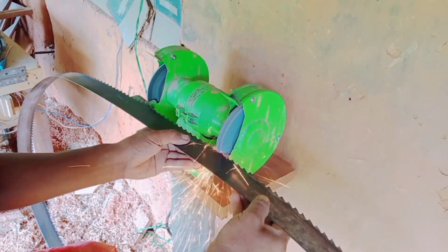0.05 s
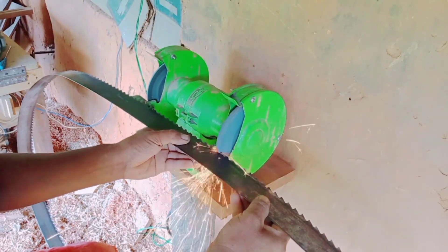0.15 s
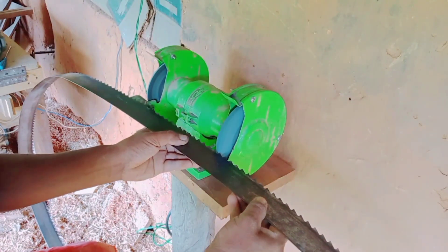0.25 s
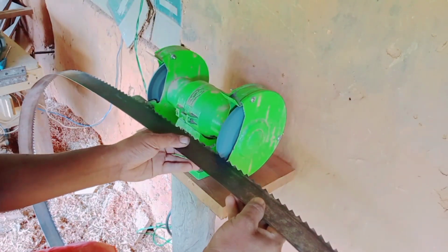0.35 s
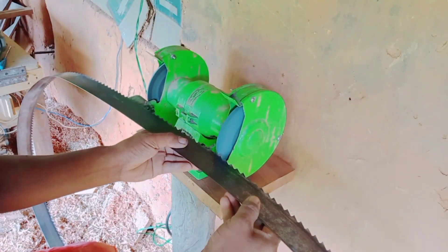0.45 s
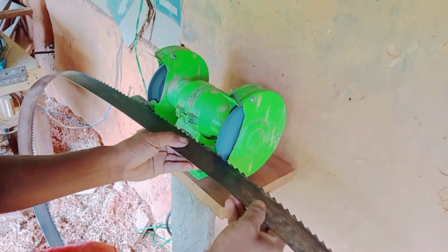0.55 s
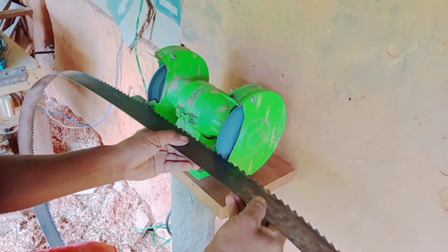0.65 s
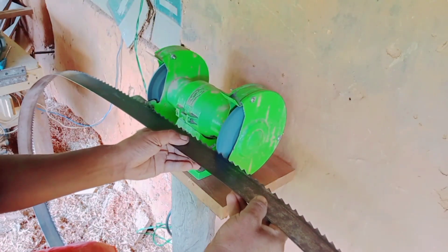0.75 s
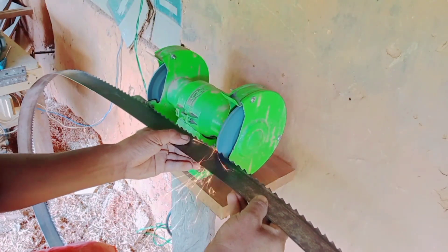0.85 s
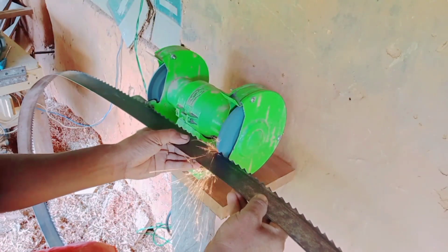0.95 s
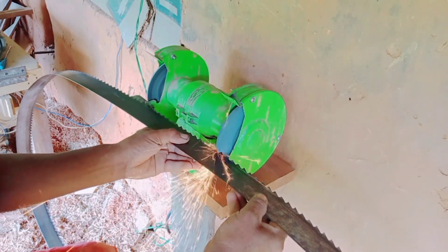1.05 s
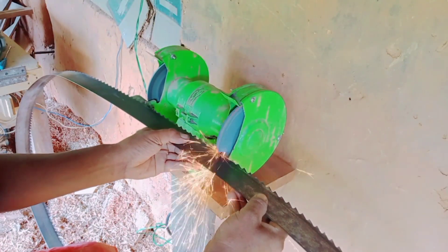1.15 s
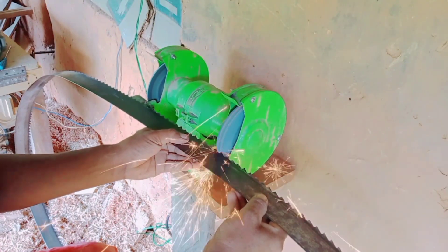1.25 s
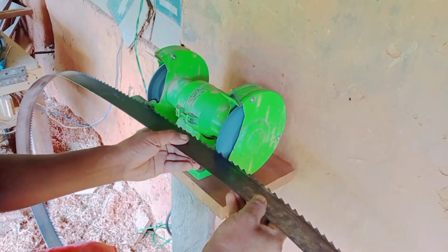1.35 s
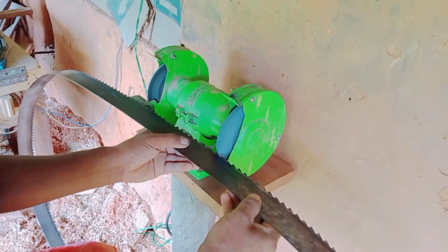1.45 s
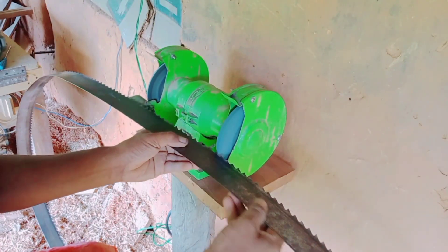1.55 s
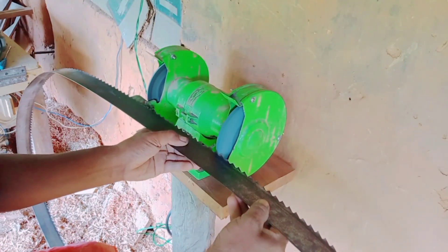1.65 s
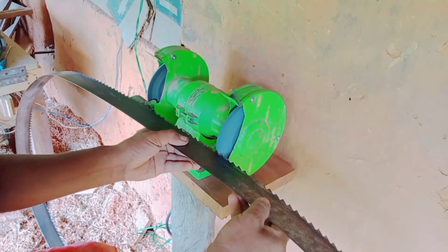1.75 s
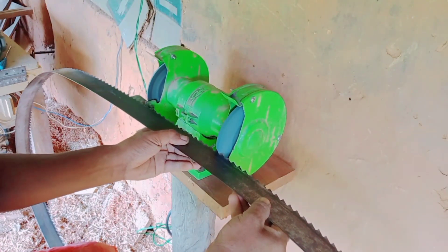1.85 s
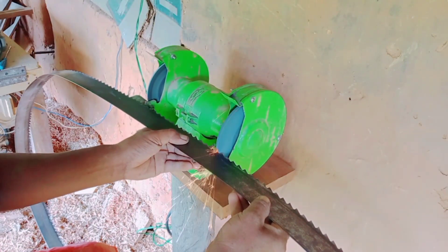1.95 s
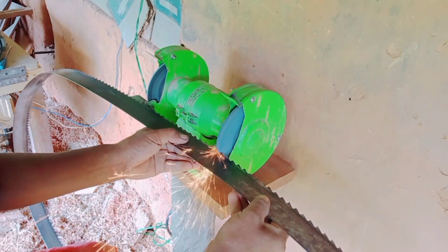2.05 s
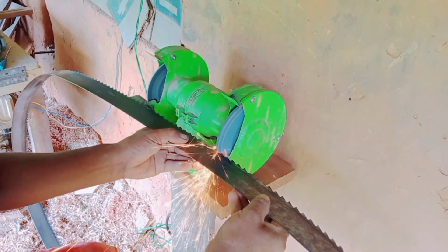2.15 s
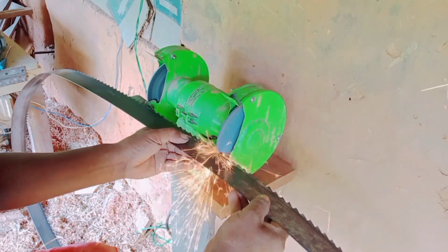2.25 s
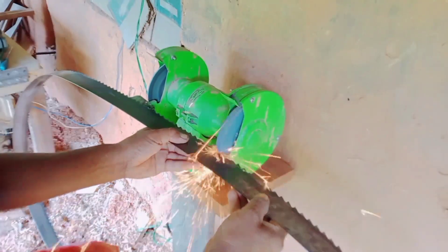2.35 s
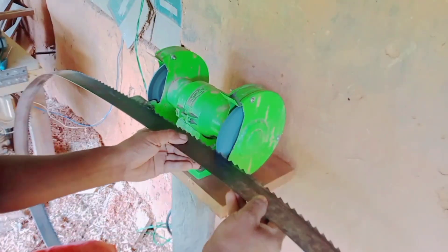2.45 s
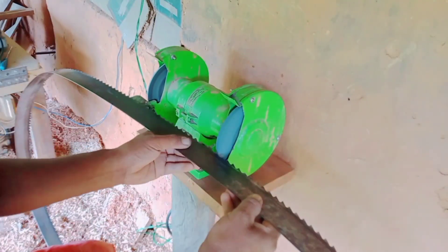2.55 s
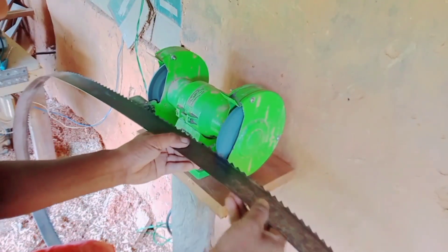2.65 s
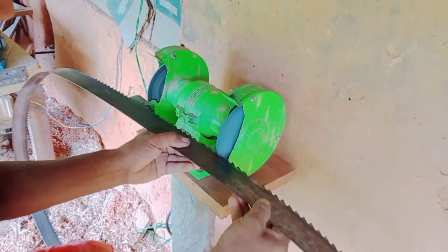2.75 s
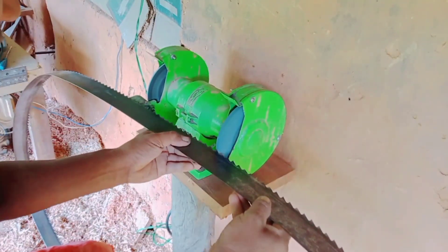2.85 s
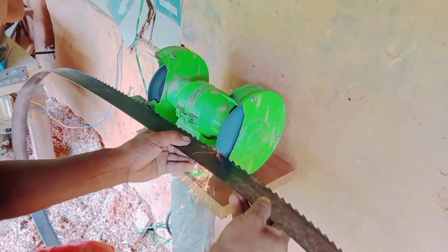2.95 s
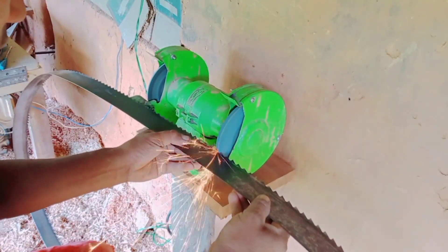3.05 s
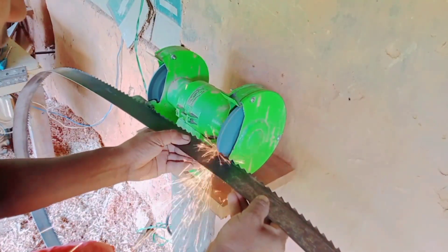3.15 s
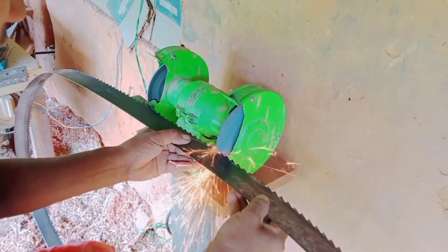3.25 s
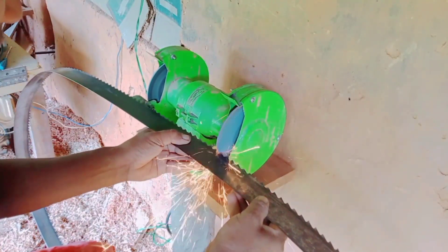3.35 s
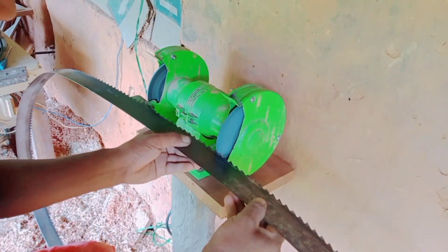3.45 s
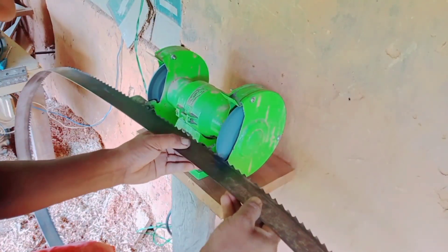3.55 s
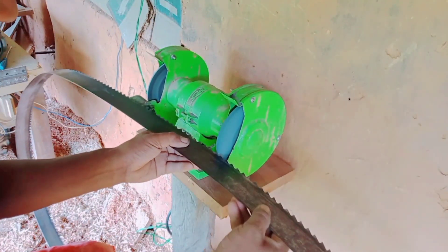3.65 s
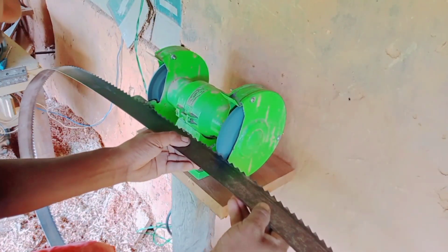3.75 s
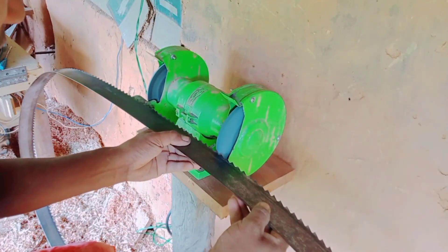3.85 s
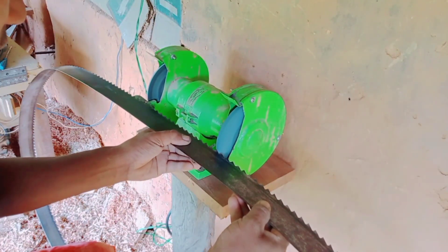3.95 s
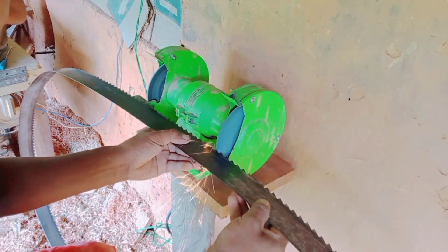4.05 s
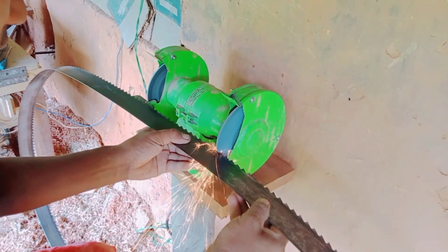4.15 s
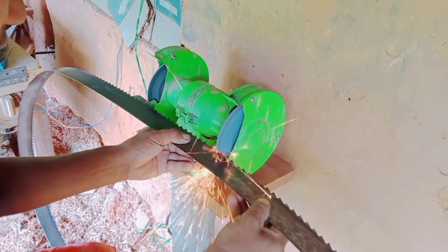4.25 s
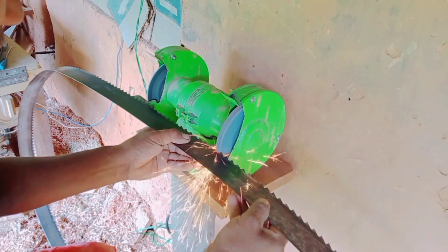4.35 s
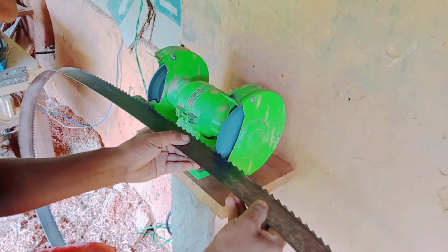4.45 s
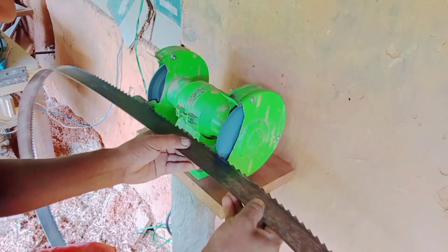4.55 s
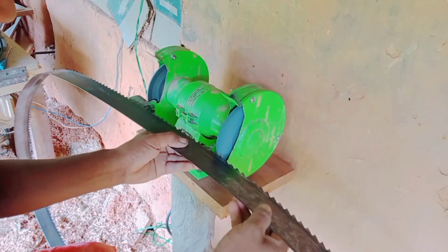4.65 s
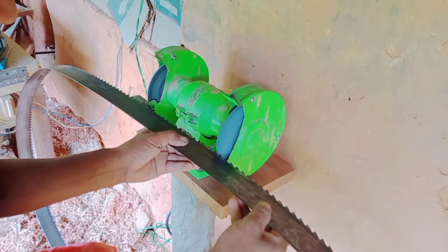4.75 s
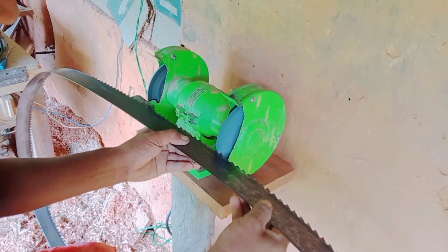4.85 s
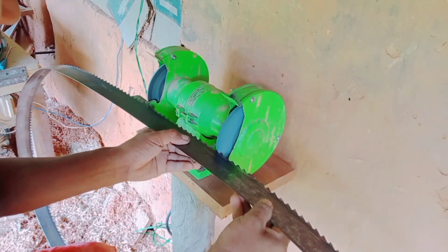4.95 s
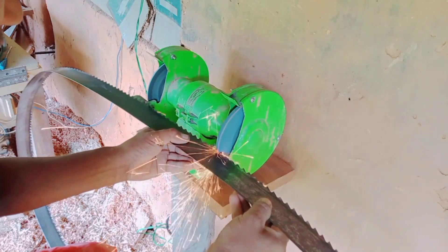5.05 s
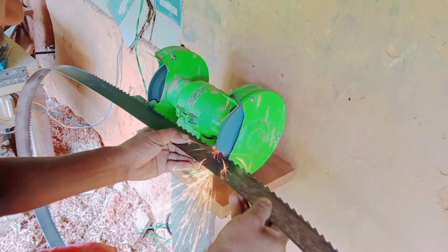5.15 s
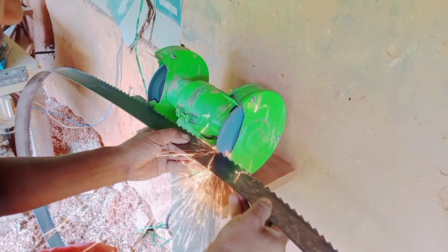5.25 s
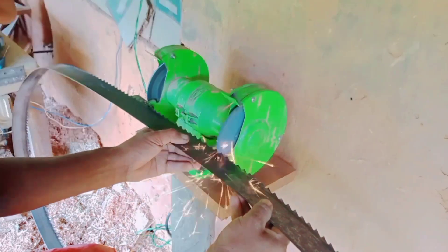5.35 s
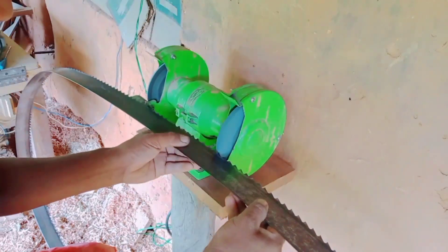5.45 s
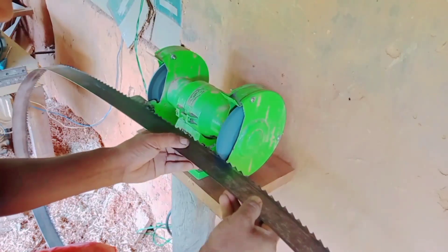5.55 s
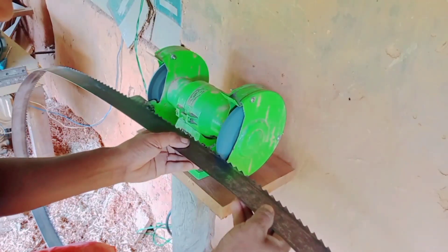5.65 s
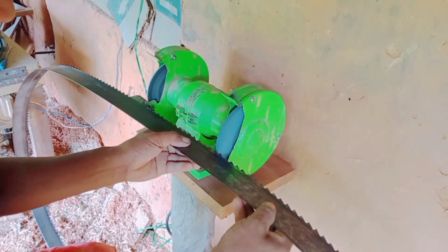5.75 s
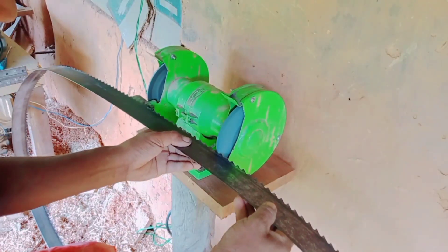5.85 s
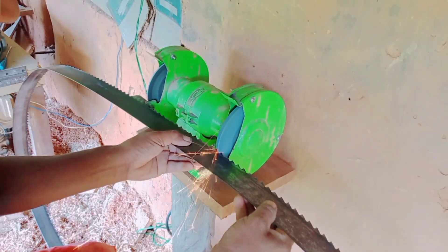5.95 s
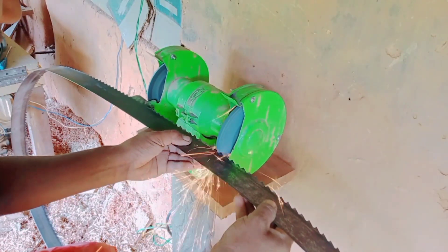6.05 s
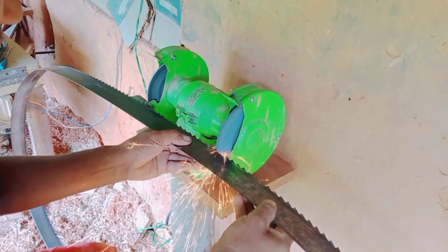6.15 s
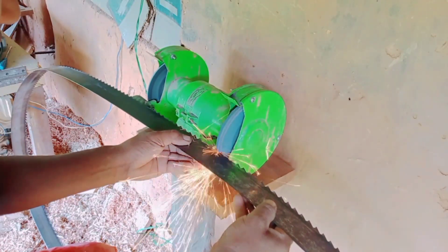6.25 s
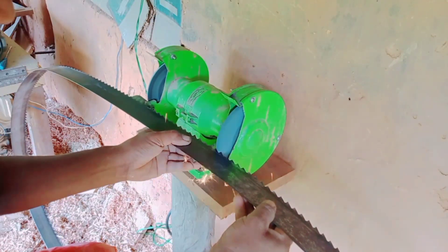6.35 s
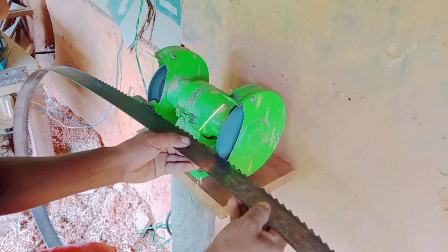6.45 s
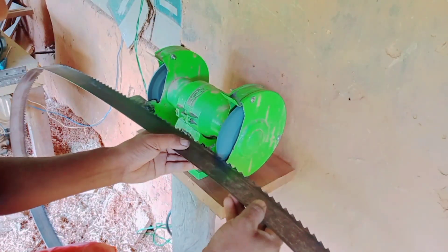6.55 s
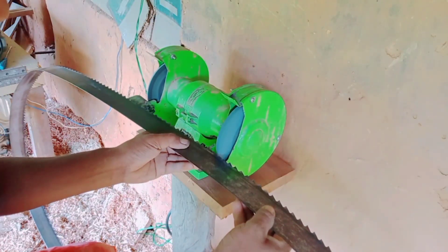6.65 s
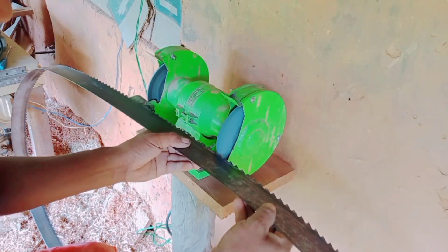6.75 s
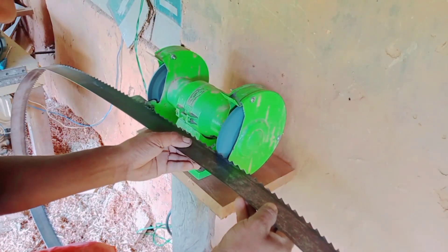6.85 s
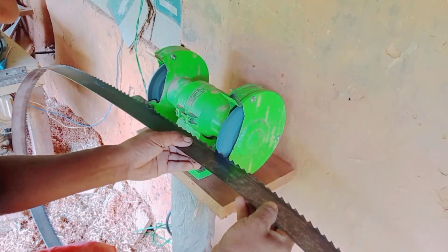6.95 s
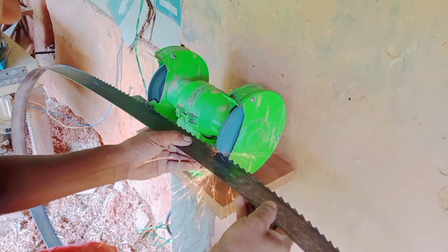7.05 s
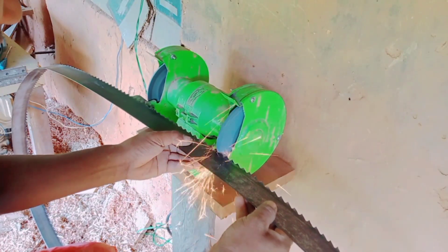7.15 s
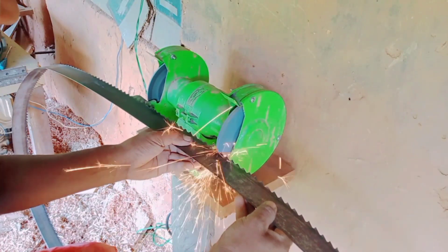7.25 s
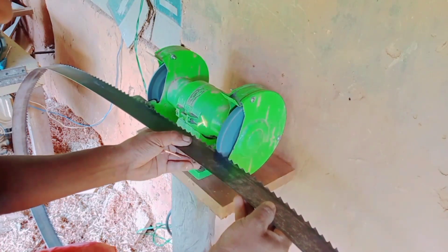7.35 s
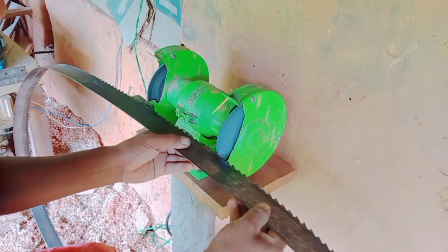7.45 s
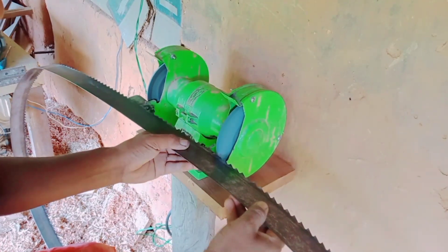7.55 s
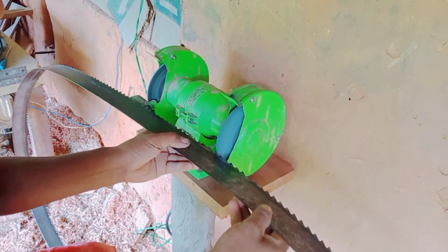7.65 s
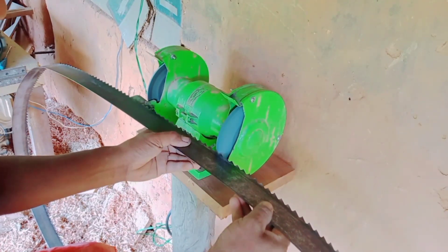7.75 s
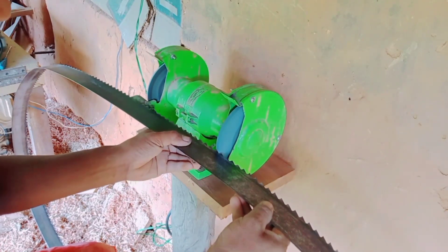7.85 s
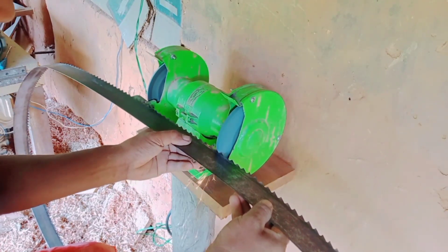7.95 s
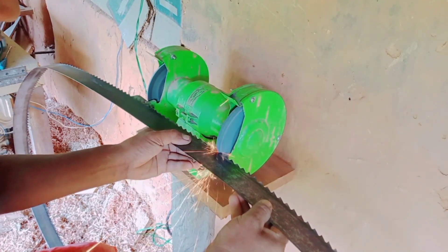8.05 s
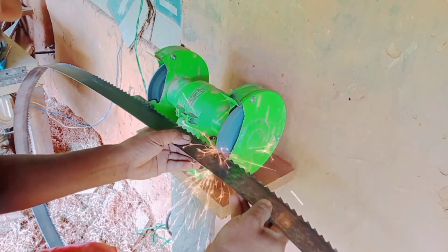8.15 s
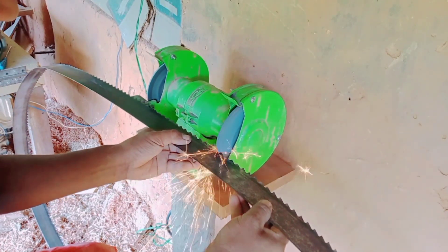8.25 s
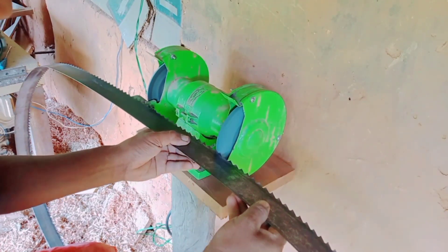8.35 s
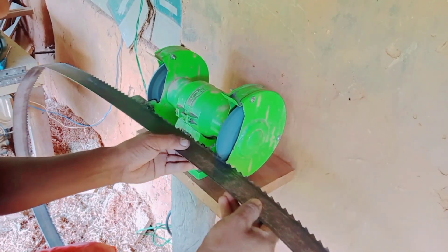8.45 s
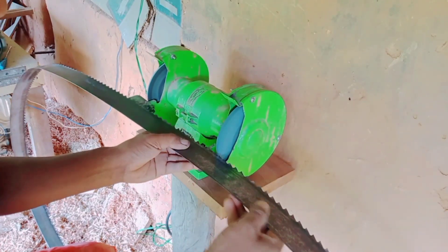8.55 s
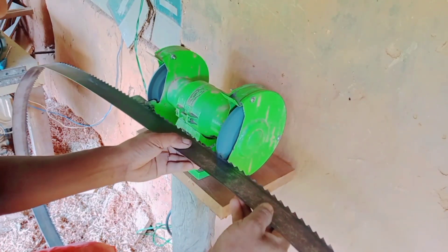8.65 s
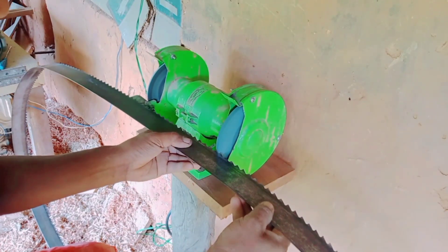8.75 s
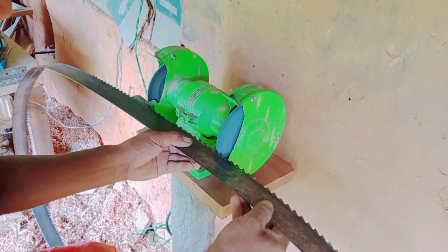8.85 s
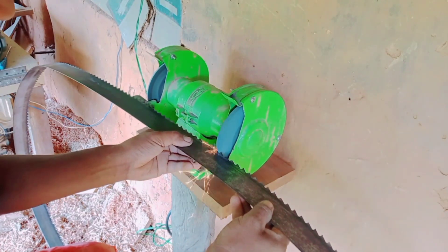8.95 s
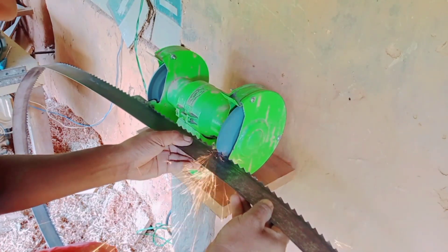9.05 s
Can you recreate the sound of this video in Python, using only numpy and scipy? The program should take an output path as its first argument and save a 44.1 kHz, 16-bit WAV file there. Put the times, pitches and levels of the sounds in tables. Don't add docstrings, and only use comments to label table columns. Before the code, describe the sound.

A small, close microphone in an open yard hears a saw blade ground on a bench grinder. A strong rasp is already under way at 0 s and stops at about 0.26. Further strokes begin near 0.9, 2.0, 3.0, 4.0, 5.0, 6.0, 7.0, 8.0 and 9.0 s, each lasting roughly 0.35 to 0.5 s. Most start with a light, fluttering buzz of knocks, about seventy-three per second, then thicken into rough, dense chatter as pressure grows and the wheel slows slightly. Bright grit hiss and a noisy metallic whistle, shifting from tooth to tooth, ride on top. Some strokes skip briefly or end with a sharp tick. The last, from 9.0 to 9.4, stays lighter and hissier. Blade, bench and yard ring for a fraction of a second after each; the gaps hold only a very faint, thin, patchy motor whirr.

```python
import sys
import numpy as np
from scipy import signal
from scipy.fft import rfft, irfft
from scipy.io import wavfile
from scipy.ndimage import uniform_filter1d

SR = 44100
rng = np.random.default_rng(int(sys.argv[2]) if len(sys.argv) > 2 else 0)


def level_to_linear(level):
    exponent = np.asarray(level, float) / 20
    return 10 ** exponent


def unload_audio(sound):
    columns = np.transpose(np.atleast_2d(sound))
    steps = np.round(np.clip(columns, -1, 1) * 32767)
    wavfile.write(sys.argv[1], SR, steps.astype(np.int16))


N = 401310
T = np.arange(N) / SR
FREE_HZ = 73.1

# [high spot passes t/s, lift-off t/s, wheel speed f/Hz, slowing Hz per s, whistle f/Hz]
STROKES = [(.006, .259, 72.5, 14, 4300), (.919, 1.348, 73.7, 12, 4500), (1.965, 2.456, 73.8, 11, 5100),
           (2.991, 3.44, 74.0, 15, 5000), (4.0425, 4.443, 73.8, 14, 4500), (5.034, 5.415, 73.5, 18, 4300),
           (6.003, 6.45, 73.3, 14, 4500), (7.036, 7.40, 73.2, 12, 4400), (8.013, 8.345, 73.7, 17, 4600),
           (8.9905, 9.4, 73.8, 1, 5150)]


def evened(x):
    return x / np.sqrt(np.mean(x ** 2) + 1e-20)


def read(points, hz):
    f, value = np.transpose(points)
    return np.interp(np.log(hz + 1), np.log(f + 1), value)


def causal(db):
    log = np.log(level_to_linear(np.maximum(np.r_[db, db[-2:0:-1]], -100)))
    return np.fft.ifft(np.exp(np.conj(signal.hilbert(log)))).real[:len(db)]


def coloured(x, points):
    gain = level_to_linear(read(points, np.fft.rfftfreq(len(x), 1 / SR)))
    return evened(irfft(rfft(x) * gain, len(x)))


def resonate(x, hz, width, order=1):
    turn = np.exp(2j * np.pi * np.cumsum(hz * np.ones(N)) / SR)
    r = np.exp(-np.pi * width / SR)
    smooth = signal.lfilter([(1 - r) ** order], np.poly([r] * order), x * turn.conj())
    return 2 * (turn * smooth).real


def wander(per_s):
    knots = rng.standard_normal(int(N / SR * 600))
    return evened(np.interp(T * per_s, np.arange(len(knots)), knots))


def tooth_number():
    return np.searchsorted(np.array(STROKES)[1:, 0] - .1, T)


def wheel():
    catch_up_s = 0.15
    turns = np.zeros(N)
    for s, off, hz, sag, _ in STROKES:
        after = T >= s - .004 if s > .5 else T >= 0
        t = T[after]
        loaded = hz - sag * (np.minimum(t, off) - s)
        speed = FREE_HZ - (FREE_HZ - loaded) * np.exp(-np.maximum(t - off, 0) / catch_up_s)
        turns[after] = np.cumsum(speed) / SR + (t[0] - s) * hz
    return turns


def motor(turns):
    # [multiple of the wheel speed, level/dB]
    shaft = [(2, -99), (3, -111), (4, -104), (5, -106), (6, -98.5), (7, -107), (8, -98), (9, -100),
             (10, -88.5), (11, -81), (12, -90), (13, -80), (16, -108), (18, -108), (20, -105)]
    # [f/Hz, level/dB per Hz]
    whirr = [(625, -31), (790, -5), (970, -5), (1080, -37), (1750, -38), (1980, -15), (2470, -5),
             (3400, -16), (3700, -20), (4000, -24), (4500, -12.5), (5630, -11.5), (7210, -27.5),
             (9600, -25.5), (16000, -50)]
    # [f/Hz, width/Hz, level/dB]
    housing = [(785, 63, -38.5), (1660, 62, -11), (2070, 17, -18), (2250, 220, -3.5), (2960, 24, 5),
               (3370, 110, 3), (4450, 44, 1), (4980, 36, 4), (5570, 50, -7.5)]
    whirr_db = -68.5

    orders = 0
    for k, db in shaft:
        tone = np.cos(2 * np.pi * (k * turns + rng.random()))
        orders = orders + np.sqrt(2) * level_to_linear(db + 2.4 * wander(16)) * tone

    air = rng.standard_normal(N) * (1 + .3 * np.cos(2 * np.pi * turns))
    f = np.fft.rfftfreq(N, 1 / SR)
    response = sum(level_to_linear(db) / (1 + (2 * (f - hz) / w) ** 2) for hz, w, db in housing)
    hum = evened(irfft(rfft(air) * response, N))
    sound = orders + level_to_linear(whirr_db - 2.0) * coloured(air, whirr) + level_to_linear(whirr_db - 8) * hum

    hz, _, z = signal.stft(sound, SR, nperseg=1024)
    patches = uniform_filter1d(rng.standard_normal(z.shape), size=12, axis=0)
    patches = evened(uniform_filter1d(patches, size=14, axis=1))
    hz = hz[:, None]
    weak_db = np.clip(-read(whirr, hz) - 8, 0, 14) * (hz > 1000) * (hz < 6000) + 5 * (hz > 200)
    holes = level_to_linear(patches + weak_db * np.minimum(patches + .4, 0))
    return signal.istft(z * holes, SR, nperseg=1024)[1][:N]


def yard(x):
    # [f/Hz, level/dB per Hz]
    ring = [(120, -73.5), (200, -42.5), (417, -21), (532, -8.5), (716, -11), (963, -1), (1410, -41),
            (2150, -5), (3160, -11.5), (3570, -5), (4400, -8.5), (4800, -11), (7700, -17), (10000, -12.5),
            (13000, -42)]
    # [f/Hz, time to fall 60 dB t/s]
    ring_t60 = [(300, 0.11), (550, 0.2), (1000, 0.16), (2100, 0.16), (5500, 0.12), (10000, 0.15)]
    place, out = tooth_number() % 3, 0
    for k in range(3):
        hz, t, z = signal.stft(rng.standard_normal(SR // 3), SR, nperseg=512)
        modes_db = 3.8 * np.minimum(rng.exponential(1, (len(hz), 1)), 3)
        decay_db = -60 * t / read(ring_t60, hz)[:, None]
        z = z * level_to_linear(modes_db + read(ring, hz)[:, None] + decay_db)
        tail = signal.istft(z, SR, nperseg=512)[1]
        tail = tail * np.clip(np.arange(len(tail)) / SR / 0.014, 0, 1)
        out = out + signal.oaconvolve(x * (place == k), tail / np.linalg.norm(tail))[:N]
    return out


def hand():
    # [depth at first touch 0-1, bite t/s, depth there 0-1, firm t/s, eases off t/s]
    presses = [(0, .02, 0.7, 0.065, 0.26), (.25, 1.0, .3, 1.24, 1.335), (0.05, 2.05, .13, 2.25, 2.447),
               (0.1, 3.17, .25, 3.27, 3.41), (.2, 4.19, .2, 4.215, 4.428), (0.2, 5.1, 0.6, 5.13, 5.408),
               (0.12, 6.07, 0.3, 6.095, 6.395), (0.15, 7.105, .2, 7.122, 7.365),
               (.15, 8.06, 0.35, 8.075, 8.338), (0.3, 9.0, 0.2, 9.012, 9.19)]
    # [effort/dB, knocks, grit and whistle under the light touch/dB each, firm depth 0-1]
    teeth = [(3, 4, 3.5, 4, .7), (-0.5, 4, 0, -5, .75), (-0.5, -1.5, -4.5, -5.5, .9),
             (-0.5, 4.5, -1.5, -3.5, .85), (0, 4, -4, -3.5, .75), (1.5, 0, -0.5, -5.5, 0.7),
             (0, 7, 3, 0.5, .78), (-0.5, 1.5, 1, -1, .8), (0.5, 4, 0, -1.5, .6), (-4.5, 2.5, 7, -1, .02)]
    # [t/s, length/s, loss/dB]
    skips = [(.148, .012, 0), (4.18, .02, -8), (6.19, 0.013, -4.5), (6.155, .07, -2), (6.425, 0.0608, -16),
             (8.092, 0.016, -16.5), (8.141, 0.026, -2.5), (8.191, .03, -4)]
    # [level at full depth/dB, change per tenfold depth/dB, change on landing/dB,
    # change while letting go/dB, share of a skip's loss]
    layers = [
        (-26.5, 8.5, -25, -4.5, 0.9),
        (-50.5, -1, -6.5, 0, .25),
        (-35, -3.5, -8.5, 3.5, .3),
    ]
    lead_s = .004
    sink, last = 1.3, .05
    land_s, sudden = 0.024, .2
    brush_s, brush_db, trail_s, trail_db, grazes = 0.0073, -17, 0.028, -19.5, .23

    depth, gains = np.zeros(N), np.zeros((len(layers), N))
    skip_db = sum(db * np.clip(2 - 4 * abs(T - s) / length, 0, 1) for s, length, db in skips)
    for stroke, pressed, tooth in zip(STROKES, presses, teeth):
        spot, off, *_ = stroke
        first, bite, held, firm, ease = pressed
        effort_db, *own_db, deep = tooth
        touch, gentle = spot - lead_s, np.clip(1 - first / sudden, 0, 1)
        on = (T >= touch - brush_s * (first < grazes)) & (T < off + trail_s)
        t = T[on]
        depths = np.clip([first, held, deep, deep * sink], .01, 2)
        press = np.interp(t, [spot, bite, firm, ease], depths)
        landing = np.clip(1 - (t - touch) / land_s, 0, 1) * gentle
        light = np.interp(t, [bite, firm], [1, 0])
        going = np.clip((t - ease) / (off - ease), 0, 1)
        apart_db = brush_db * (t < touch) + trail_db * np.maximum(t - off, 0) / trail_s
        depth[on] = (press + (last - press) * going) * level_to_linear(skip_db[on])
        for k, (full_db, decade_db, land_db, go_db, skip) in enumerate(layers):
            hold_db = effort_db + full_db + own_db[k] * light + decade_db * np.log10(press)
            change_db = land_db * landing + go_db * going + skip * skip_db[on]
            gains[k, on] = level_to_linear(hold_db + change_db + apart_db)
        gains[0, on] *= (t >= touch) & (t < off)
    return depth, gains


def knock(snap, push, snap_width, push_width, lag):
    t = np.arange(1024) / SR
    snap_s, push_s = 4.5e-5 * level_to_linear(10.7 * snap_width), 0.0002 * level_to_linear(13.9 * push_width)
    late = np.maximum(t - 2e-4 - 0.00063 * lag, 0) / push_s
    return push * late * np.exp(1 - late) - snap * t / snap_s * np.exp(1 - t / snap_s)


def knocking(turns, meets, gain, count=18):
    # [t/s, snap level/dB, push level/dB, snap width 0-1, push width 0-1]
    bounces = [(.911, -1, -5, 0.24, 0.27), (1.349, -3, -21, 0.13, .5), (1.364, -5, -22.5, 0.44, 0.8),
               (5.036, 3, -19, 0.12, 0), (5.040, -6.5, -26, 0.6, 0), (6.431, -16, -21, 0.1, 0.6),
               (6.447, 2.5, -17, 0.25, 0), (7.39, -16, -31, 0.6, 0), (7.4, -10.5, -19.5, 0.23, 0.8),
               (8.077, -1, -23, 0.02, .1), (8.102, -2, -6.5, 0, 0.3), (9.004, -26, -4.5, 0.4, 0.9),
               (9.045, -24, -11, 1, 0.46), (9.085, -15, -14, .4, .8), (9.099, -18, -18, 1, 0.9)]
    rebounds = [(8.982, -6, -15, 1, .1), (8.990, -10, -24, 0.31, 0.99), (8.996, 0, -16, 0.9, 0.54)]
    # [f/Hz, level/dB per Hz]
    knock_colour = [(15, -56), (25, -51), (38, -26), (140, 1), (332, 1.5), (375, 0.5), (571, -1),
                    (730, -2.5), (786, -2), (1730, -5.5), (3900, -8), (5500, -14), (9000, -26.5),
                    (11700, -78.5), (19800, -120)]

    mix, snap_width, push_width, lag, sign = rng.random((count, 5)).T[..., None]
    shapes = knock(1.1 - mix, 0.76 * mix, snap_width, push_width, lag)
    shapes = shapes * np.where(sign < .75, 1, -1)

    chatter_hz = 1500 * meets
    per_s = chatter_hz * np.clip(1 + .55 * wander(400), 0, 2.5)
    high_spot = np.diff(np.floor(turns), prepend=0) == 1
    hits = (rng.random(N) < per_s / SR) | high_spot
    rate = (uniform_filter1d(chatter_hz, size=1216) + FREE_HZ) / SR
    crowd = np.sqrt(rate * (shapes ** 2).sum(1).mean())
    size = hits * level_to_linear(3.42 * np.minimum(rng.exponential(1, N), 3) - 3) * gain / crowd
    for s, *_ in bounces + rebounds:
        size[round((s - .003) * SR):round((s + .003) * SR)] = 0

    which = rng.integers(0, count, N)
    force = sum(signal.oaconvolve(size * (which == k), shape)[:N] for k, shape in enumerate(shapes))
    for face, events in ((1, bounces), (-1, rebounds)):
        for s, snap_db, push_db, snap_w, push_w in events:
            part = force[round(s * SR):][:1024]
            part += 0.33 * face * knock(level_to_linear(snap_db), level_to_linear(push_db), snap_w, push_w, 0.15)[:len(part)]

    own = (abs(rfft(shapes, 2048)) ** 2).mean(0)
    own_db = uniform_filter1d(10 * np.log10(own), size=5)
    body = causal(read(knock_colour, np.fft.rfftfreq(2048, 1 / SR)) - own_db)
    body = body / np.sqrt((abs(rfft(body, 2048)) ** 2 * own).sum() / own.sum())
    squashed = 0.26 * np.tanh(signal.oaconvolve(force, body)[:N] / 0.3)
    return signal.sosfilt(signal.butter(2, 7500, fs=SR, output="sos"), squashed)


def grinding(turns, depth, gains):
    rim = [(0, 0), (.12, .15), (.3, .4), (.52, .75), (.64, .5), (.78, .55), (.9, .8), (1, .9)]
    # [f/Hz, level/dB per Hz]
    grit = [(3820, -32.5), (6500, -5), (7530, -15.5), (8620, -14), (9230, -14), (9990, -4.5), (11000, -5),
            (12800, -16), (15200, -21), (15800, -32.5), (16000, -27.5)]
    # [multiple of the whistle f, width/Hz, level/dB]
    partials = [(.55, 900, -13), (.78, 900, -8), (1.0, 1100, 0), (1.22, 1000, -14)]

    shake = .035 * wander(70)
    dip = np.interp(turns % 1, *np.transpose(rim))
    meets = np.clip((depth * (1 + 2 * shake) - dip) / .3, 0, 1)
    swell = 0.74 + 0.45 * meets + 0.98 * np.exp(-(turns % 1) / 0.13)
    flicker = level_to_linear(2.0 * wander(330))
    hiss = gains[1] * swell * flicker * coloured(rng.standard_normal(N), grit)

    rub = gains[2] * swell * flicker * rng.standard_normal(N)
    tooth_hz = np.array(STROKES)[tooth_number(), 4]
    tooth_hz = tooth_hz * (1 + .04 * wander(25))
    whistle = 0
    for k, width, db in partials:
        whistle = whistle + level_to_linear(db + 2 * wander(40)) * resonate(rub, k * tooth_hz, width, order=2)
    return knocking(turns, meets, gains[0]), hiss + 1.73 * whistle


def scene():
    turns = wheel()
    depth, gains = hand()
    knocks, hiss = grinding(turns, depth, gains)
    firm = np.clip(uniform_filter1d(depth, size=400), .3, 1)
    after_ring = level_to_linear(-17.5) * yard(firm * knocks + 2.7 * hiss)
    return (knocks + hiss + after_ring + motor(turns))[None]


def top_cut(x):
    return signal.sosfilt(signal.butter(12, 16420, fs=SR, output="sos"), x)


def record(dry):
    thin = signal.sosfilt(signal.butter(1, 45, "high", fs=SR, output="sos"), dry)
    edge = signal.firwin(255, 15850, window=("kaiser", 9), fs=SR)
    return top_cut(signal.oaconvolve(thin, edge[None], "same"))


dry = scene()
out = record(dry)
unload_audio(out)
```